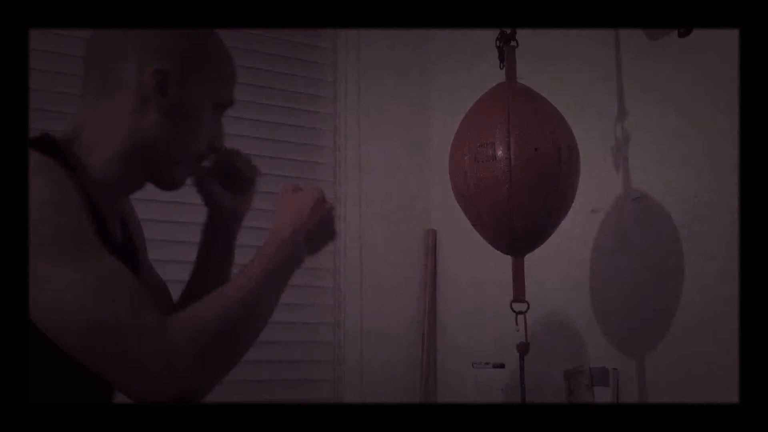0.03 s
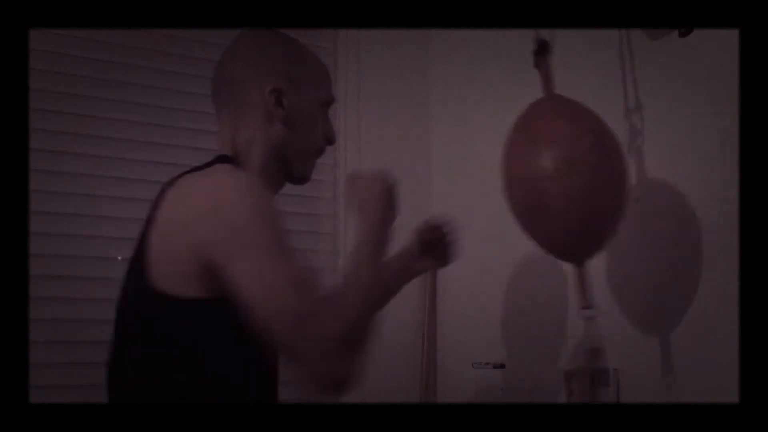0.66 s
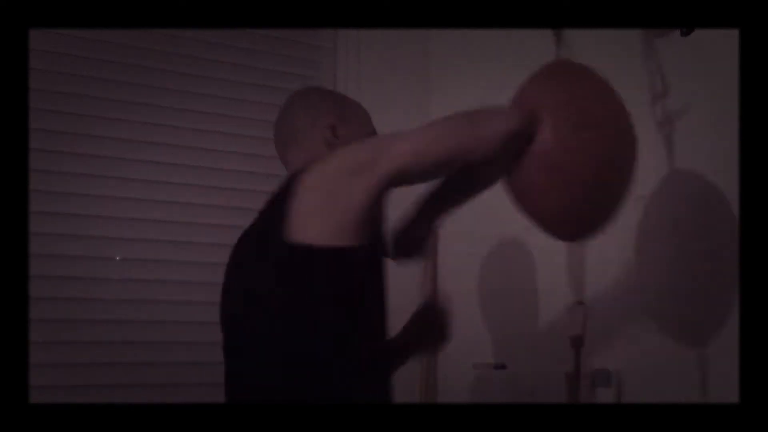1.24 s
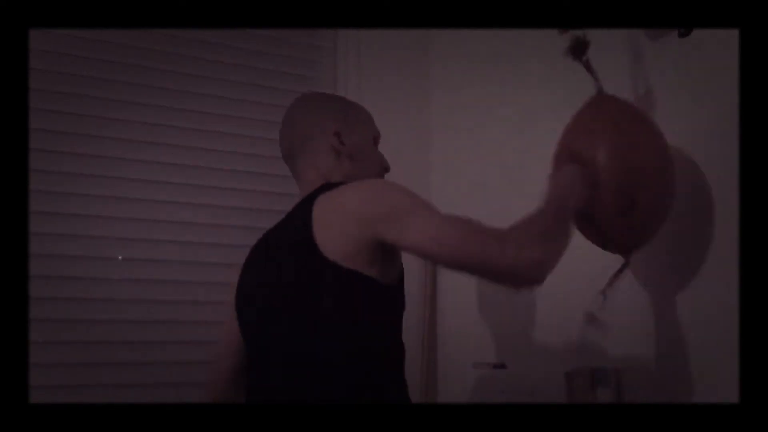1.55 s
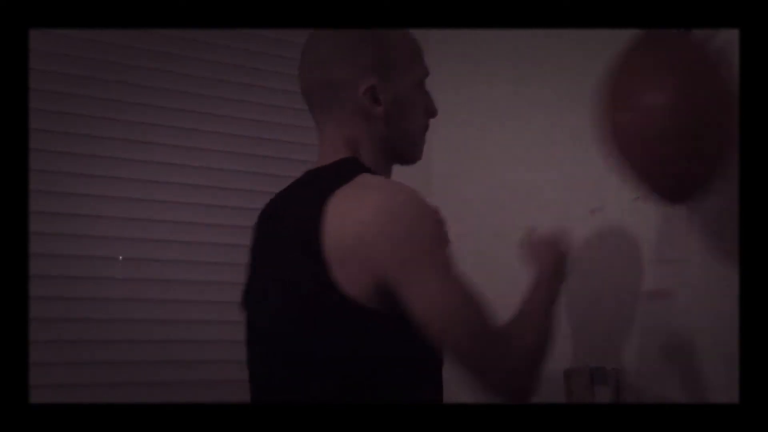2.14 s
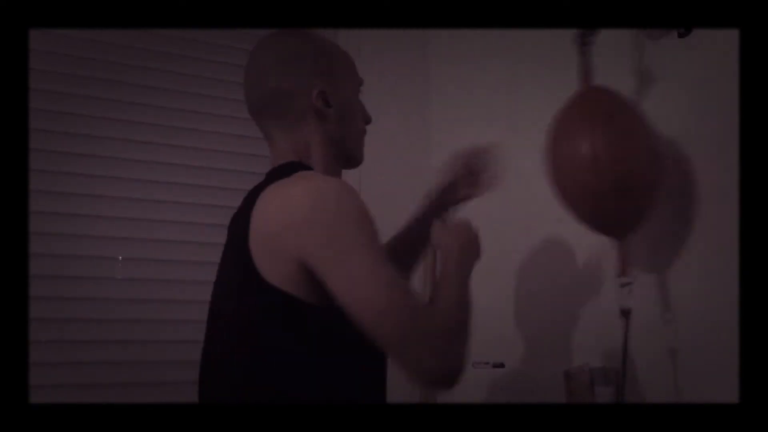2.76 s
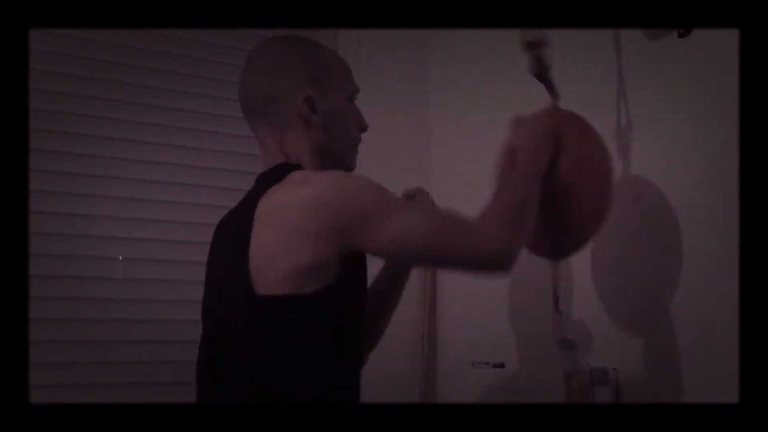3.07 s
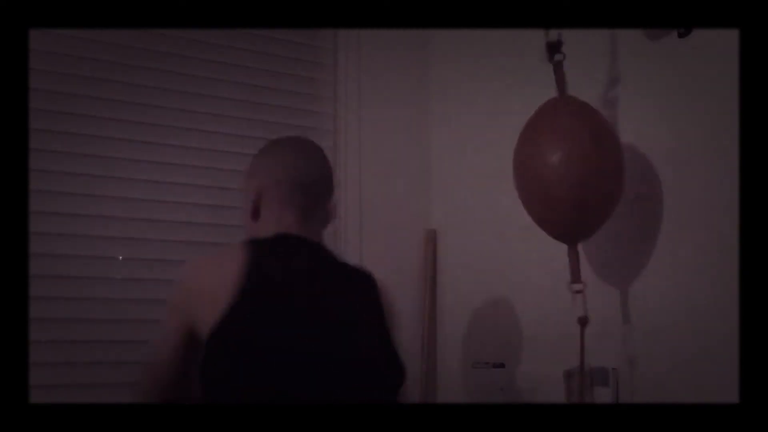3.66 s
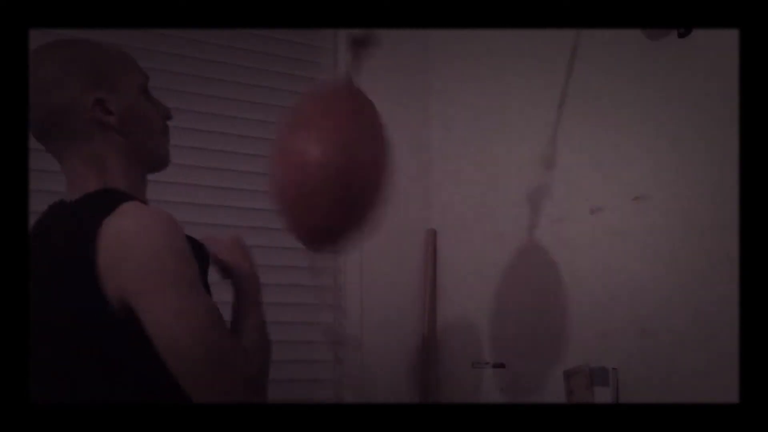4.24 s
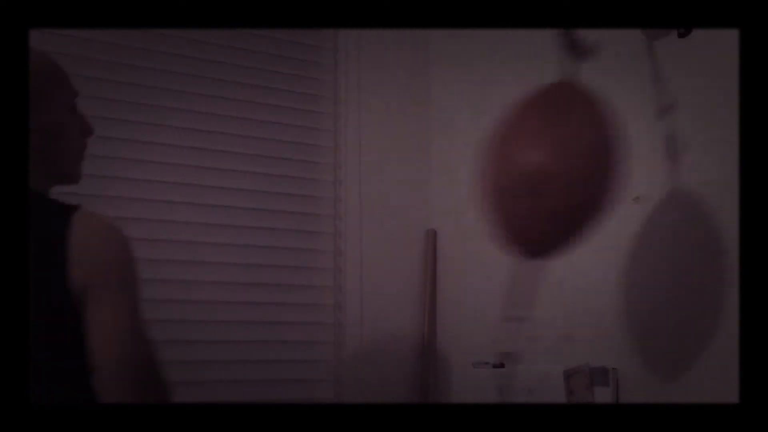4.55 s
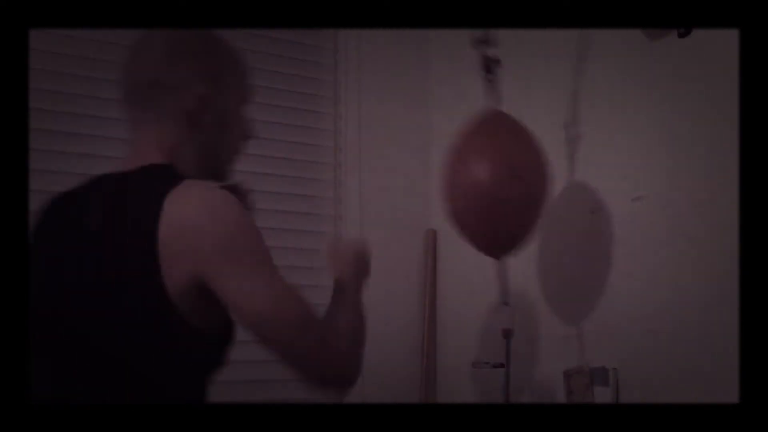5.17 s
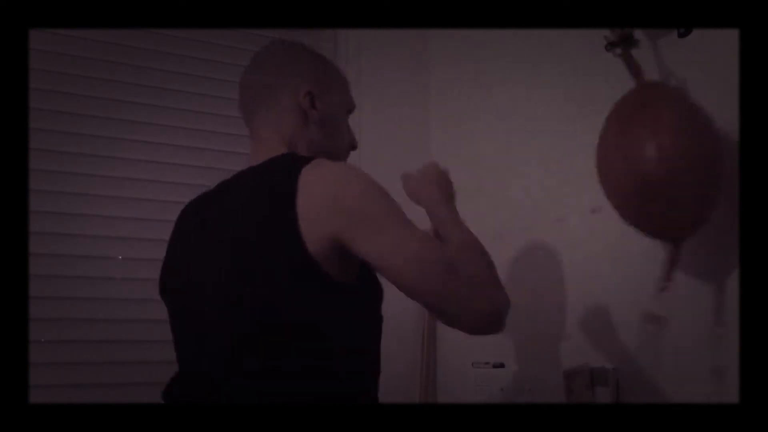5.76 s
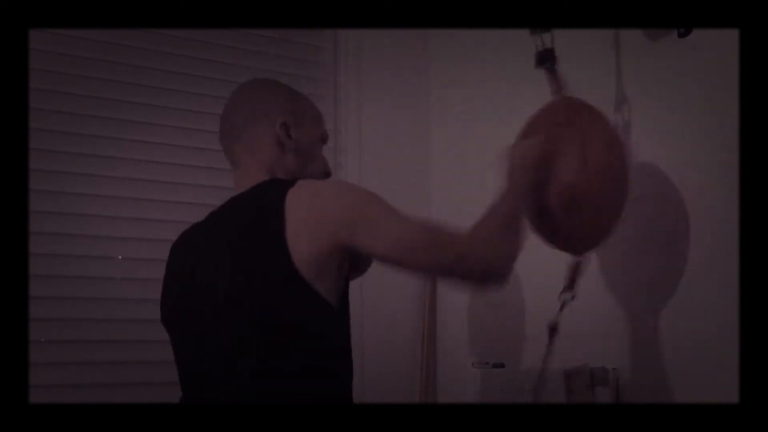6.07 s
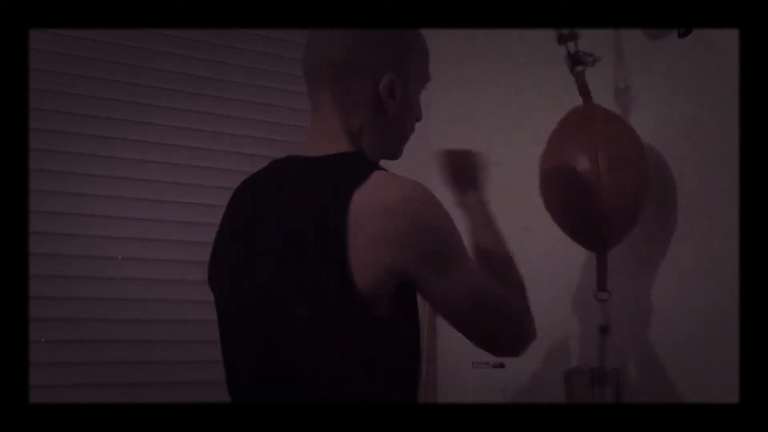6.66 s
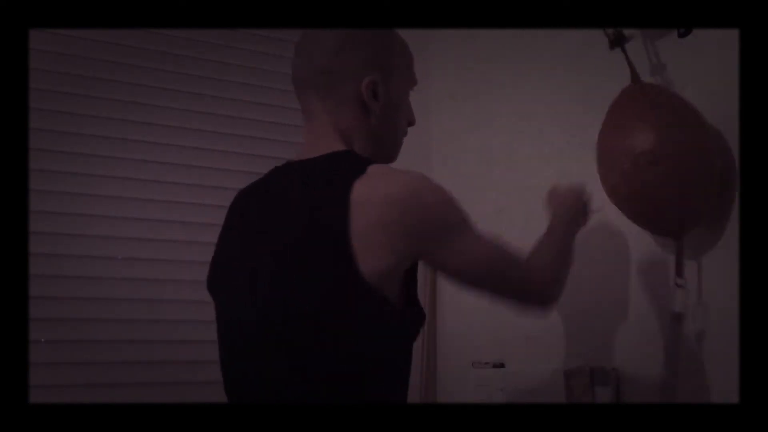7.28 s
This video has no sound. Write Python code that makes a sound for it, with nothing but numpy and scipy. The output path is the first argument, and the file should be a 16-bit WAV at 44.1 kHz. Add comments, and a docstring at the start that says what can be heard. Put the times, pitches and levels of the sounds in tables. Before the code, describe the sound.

Bare fists and elbows thud quickly on a leather double end bag, its metal fittings clinking and rattling in a small room.

```python
"""Thuds and slaps, close up: bare fists and elbows drum on a leather double end bag.
Each blow rings the air in the bag and tugs the cords, which boom in their anchors. As the bag swings,
its steel hook clinks and the links and swivels rattle. One glancing fist squeaks; feet shift softly.
One microphone stands beside the bag, in a small, hard-walled room with a faint hush of its own."""
import sys
import numpy as np
from scipy import signal
from scipy.fft import rfft, irfft, next_fast_len
from scipy.io import wavfile
from scipy.ndimage import uniform_filter1d, map_coordinates

SR = 44100
rng = np.random.default_rng(int(sys.argv[2]) if len(sys.argv) > 2 else 0)


def int16_out(signal):
    """Quantize to a 16-bit WAV file."""
    q = np.round(np.clip(np.atleast_2d(signal).T, -1, 1) * 32767)
    wavfile.write(sys.argv[1], SR, q.astype(np.int16))


N = 322371
T = np.arange(SR // 2) / SR  # the life of one sound, in seconds

# Levels in the tables are relative: each source adds its own trim.
# Blows on the bag. Each row: start in seconds, level in dB, offsets of thud, slap and crack in dB,
# pitch of the crack in Hz, offset of the ringing air inside in dB.
BAG_BLOWS = [(0.315, -9.5, -6.5, -8.5, -13, 4350, 1.5), (0.354, -12, -16, -27, -23, 2590, -4),
             (0.611, -20, -5.5, -10.5, -16, 3420, -12), (0.807, -7.5, -15.5, -16, -13, 2500, -3),
             (0.85, -9.5, -28, -17, -13, 2600, 0.5), (1.103, -11, -10.5, -11.5, -17.5, 2530, -4.5),
             (1.331, -14, -3.5, -6, -4.5, 2650, 3), (1.417, -18, -16, -23, -19, 3670, 6.5),
             (1.614, -11.5, -9.5, -18.5, -16, 2620, 0), (1.836, -11, -6, -10.5, -19, 2650, -5.5),
             (2.05, -14, -4, -9.5, -9, 2810, 3), (2.104, -17.5, -2.5, -21, -16, 3630, -5),
             (2.3285, -9, -16, -7, -2.5, 2500, -4), (2.632, -11, -3, -12.5, -19, 2440, -5),
             (2.869, -9, -9, -6.5, -36, 2640, -4), (3.107, -11.5, -11.5, -11, -21, 3320, 0.5),
             (3.477, -12, -10, -11.5, -13, 3430, -2.5), (3.972, -6, -1, -4.5, -1, 4330, -3),
             (4.087, -14, 2.5, -8, -2.5, 3110, -2), (4.109, -11, -33, -5, -9, 2730, 0.5),
             (5.118, -6.5, -7, -15, -11, 2870, -5.5), (5.448, -11.5, -7, -7.5, -16, 3550, -0.5),
             (5.649, -10, -10.5, -14.5, -14.5, 2480, -5.5), (5.907, -12.5, -5, -11.5, -5, 3670, -7),
             (6.108, -13.5, -8, -11.5, -6, 2740, -3), (6.361, -12.5, -6, -13.5, -20.5, 2940, 2.5),
             (6.411, -18, -5.5, -23, -17, 4150, -1), (6.572, -10.5, -6, -9.5, -11.5, 3040, 3),
             (6.819, -18, -5.5, -3, -34, 3290, -20), (7.033, -8, -8, -13, -16, 2390, -5),
             (7.253, -10, -5.5, -16, -11, 2380, 2.5), (7.304, -14, -31, -28, -35, 2760, -3)]
# Knuckles skidding on the leather: time in seconds, pitch in Hz, level in dB.
KNUCKLE_SKID = (5.1175, 2950, -17.5)
# The hook snapping taut. Each row: start in seconds, level in dB, offsets of sparkle and ring in dB.
HOOK_CLINKS = [(2.9655, -14.5, -12.5, -3), (3.2008, -17.5, -16, 2), (3.6715, -12.5, -13, -0.5),
               (4.1227, -13.5, -10.5, -3), (6.6778, -8, -8.5, -4)]
# The cord shaking the hook in its eye. Each row: start in seconds, level in dB, ring offset in dB.
HOOK_JOLTS = [(0.4651, -23.5, 4.5), (0.6348, -31.5, 5), (0.905, -25.5, 7.5), (3.5652, -19.5, 3.5),
              (4.043, -19.5, -3), (4.295, -27.5, 5), (5.227, -33, -10), (5.2798, -29, 7), (5.741, -25, 2.5),
              (6.4349, -24, 1), (6.921, -25.5, 9)]
# Links slipping. Each row: start in seconds, click level in dB, level of the swivels' turn in dB.
LINK_SLIPS = [(0.445, -32, -43), (0.665, -32, -45), (1.018, -30.5, -43), (1.204, -30, -46),
              (1.385, -36, -38), (1.451, -23.5, -46), (1.541, -29.5, -38), (1.675, -46, -40),
              (1.8214, -27, -50.5), (1.89, -36, -36.5), (1.9452, -31, -57), (2.0055, -24, -48),
              (2.242, -27, -54), (2.446, -37, -38), (2.5308, -19, -36), (2.6562, -21, -39),
              (2.7596, -28, -40), (3.15, -39, -28.5), (3.3812, -24.5, -48), (3.504, -26, -33.5),
              (3.8457, -22.5, -47), (4.332, -26.5, -42), (4.48, -47, -47), (4.6265, -33, -48),
              (4.7737, -32, -43.5), (4.86, -40, -39.5), (5.31, -36, -41), (5.543, -21, -53),
              (5.695, -25.5, -36.5), (5.822, -25.5, -38), (6.011, -21, -38.5), (6.192, -21.5, -33),
              (6.26, -38, -41.5), (6.39, -34, -35), (6.935, -28, -37), (7.065, -33, -38),
              (7.13, -42, -37.5)]
# How hard the swinging bag shakes its rigging. Each row: time in seconds, level in dB.
SWING_LEVELS = [(0.45, -59), (0.5, -53), (1.0, -45.5), (1.17, -49), (1.33, -50), (1.52, -40.5),
                (1.73, -49.5), (2.32, -46), (2.84, -41), (3.91, -45.5), (4.19, -42.5), (4.62, -55.5),
                (5.13, -56.5), (5.32, -49.5), (5.57, -52), (5.86, -44), (7.31, -44.5)]
# Soft footfalls. Each row: start in seconds, level in dB.
FOOTFALLS = [(0.713, -22.5), (0.98, -23.5), (1.48, -18.5), (2.764, -31), (3.6, -18.5), (3.75, -27.5),
             (4.334, -15), (4.48, -23), (4.777, -25.5), (4.845, -24), (6.25, -14.5), (6.314, -26)]

# Resonances. Each row: frequency in Hz, level in dB, time to fall 60 dB (t60) in seconds.
BAG_MODES = [(596, -15, .32), (520, -21, .15), (870, -22, .15), (985, -23, .2), (1090, -26, .18),
             (1650, -24, .18)]  # air and skin of the bag
ANCHOR_MODES = [(40.2, -16.5, 0.26), (63.3, -19, 0.44)]  # ceiling and floor under the pull of the cords
HOOK_MODES = [(1610, -19, .8), (1737, -7, .65), (1951, -7, .48), (2083, -11, .7), (2341, -13, .3),
              (2481, -12, .28), (2773, -7, .4), (2796, -1, .5), (2880, -7, .26), (3297, -4, .45),
              (3732, -12, .33), (3950, -10, .22), (4690, -12, .35), (4975, -9, .33), (5182, -12, .27),
              (5632, -13, .35), (5855, -13, .33), (5991, -9, .33), (6304, -4, .3), (6880, -9, .33),
              (7523, -11, .19), (7803, -9, .18), (8089, -8, .14), (8964, -11, .33), (9315, -11, .26),
              (11978, -3, .18), (13931, 5, .12), (14230, -10, .18)]  # the steel hook
ROOM_MODES = [(118, -17, .4), (141, -4.5, .48), (197, -11, .38), (262, -11, .48), (300, -19, .3),
              (342, -18, .35)]  # standing waves between the walls

# Spectra. Each row: frequency in Hz, level in dB.
THUD_SPECTRUM = [(25, -26), (85, -25), (130, -3.5), (180, 0.5), (300, 2.5), (420, -12.5), (600, -10.5),
                 (1500, -56.5), (5000, -104)]  # the bag giving way
SMACK_SPECTRUM = [(100, -36), (300, -0.5), (520, 2), (720, -3), (950, -0.5), (1300, -10.5), (2200, -22),
                  (6000, -74.5)]  # skin on leather, the middle range
SLAP_SPECTRUM = [(300, -43), (1100, -2), (1550, 0.5), (2000, 2.5), (2400, -4.5), (3200, -19), (8000, -30)]  # skin on leather, the upper range
CLANG_SPECTRUM = [(300, -5.5), (1200, -25), (2000, -1), (2700, 6), (4500, 3), (6500, -1), (15500, -21)]  # the hook snapping taut
SPARKLE_SPECTRUM = [(500, -13), (2500, -6.5), (5000, -9.5), (6800, -5.5), (9500, -5.5), (10400, -11),
                    (12000, -6.5), (14000, -8), (15500, -7)]  # the bright edge of steel on steel
CHATTER_SPECTRUM = [(300, -35), (1400, -2), (2350, 5.5), (2950, -18), (3500, 3), (4400, 1.5), (5400, -11),
                    (15500, -11)]  # the shaken hook
RATTLE_SPECTRUM = [(300, -25), (1000, -19), (2000, 2), (4000, 5.5), (5300, 2.5), (7000, 3), (10000, 3.5),
                   (15500, 1.5)]  # the swivels together
RUMBLE_SPECTRUM = [(22, -21), (55, -9.5), (100, -4.5), (170, -1.5), (290, 1.5), (430, -11.5), (590, -1),
                   (750, -10), (1800, -15.5), (5000, -24.5)]  # cords and floor
HUSH_SPECTRUM = [(25, -4), (150, -1.5), (500, -15.5), (2000, -16), (5000, -21.5), (15000, -31)]  # the still room
# The leather's crack. Each row: frequency as a multiple of the crack's pitch, level in dB.
CRACK_SHAPE = [(.2, -3.5), (.6, -5), (.85, -4), (1.02, -0.5), (1.4, -6), (2.3, -11.5), (4.5, -15.5)]
# The swivels. Each entry: the frequency in Hz where one is brightest.
SWIVEL_PEAKS = [3840, 6540, 9000, 13700]

# The room's tail. Each row: frequency in Hz, t60 in seconds.
ROOM_DECAY = [(60, 0.78), (200, 0.52), (600, 0.5), (1500, .48), (4000, 0.36), (14000, 0.28)]
# Echoes off the nearest surfaces. Each row: delay at the microphone in seconds, level in dB.
WALL_ECHOES = [(.0042, -14.5), (.0078, -7.5), (.0096, -6), (0.016, -12.5)]


def bag():
    """The bag gives with a thud, the leather smacks and cracks, and the cords pass the jolt to the room."""
    out = np.zeros(N)
    for start, db, thud_db, slap_db, crack_db, crack_hz, air_db in BAG_BLOWS:
        crack_spectrum = [(ratio * crack_hz, level) for ratio, level in CRACK_SHAPE]
        thud = amp(thud_db - 2) * contact(THUD_SPECTRUM, t60=0.04, scatter_db=8)
        smack = amp(-6) * contact(SMACK_SPECTRUM, t60=0.045, scatter_db=-1)
        slap = amp(slap_db) * contact(SLAP_SPECTRUM, t60=0.035, scatter_db=-2)
        crack = amp(crack_db - 2.5) * contact(crack_spectrum, t60=0.022, scatter_db=2)
        air = amp(air_db + 1) * ring(BAG_MODES, attack=0.002, spread_db=2, detune=0.008)
        boom = amp(thud_db / 2 - 5.5) * ring(ROOM_MODES, attack=0.0042, spread_db=3.5)
        tug = amp(0.5) * ring(ANCHOR_MODES, attack=0.01, spread_db=-0.5)
        body = in_room(thud + smack, wet_db=-7.5, build=0.012)
        leather = in_room(slap + crack, wet_db=-6.5, build=0.004)
        add(out, start, amp(db) * (body + leather + air + boom + tug))
        # the flung bag jerks against its cords a moment later
        jerk_thud = contact(THUD_SPECTRUM, t60=0.17, scatter_db=-1)
        jerk_smack = amp(-2) * contact(SMACK_SPECTRUM, t60=0.15, scatter_db=-6)
        lag = 0.045 + 0.0052 * rng.standard_normal()
        add(out, start + lag, amp(db - 19) * (jerk_thud + jerk_smack))
    return out


def squeak(lead_s=0.03):
    """A glancing fist sticks and slips on the leather for an instant."""
    peak_time, hz, db = KNUCKLE_SKID
    swell = np.exp(-np.abs(T - lead_s) / 0.0028)
    pitch = hz * (1 + 0.091 * wobble(610)[:len(T)])
    chirp = swell * np.sin(2 * np.pi * np.cumsum(pitch) / SR)
    out = np.zeros(N)
    add(out, peak_time - lead_s, amp(db) * in_room(chirp, wet_db=-18))
    return out


def hook():
    """Steel jerks against steel: a bright clang when it snaps taut, a duller chatter when only shaken."""
    out = np.zeros(N)
    for start, db, sparkle_db, ring_db in HOOK_CLINKS:
        clang = amp(-6) * contact(CLANG_SPECTRUM, t60=0.12, scatter_db=16)
        sparkle = amp(sparkle_db + 8) * contact(SPARKLE_SPECTRUM, t60=0.088, scatter_db=24)
        tone = amp(ring_db - 9.5) * in_room(hook_ring(treble_db=sparkle_db / 2), wet_db=-14)
        add(out, start, amp(db) * (in_room(clang + sparkle, wet_db=-6) + tone))
    soft_onset = 1 - np.exp(-T / 0.013)
    for start, db, ring_db in HOOK_JOLTS:
        chatter = crest(contact(CHATTER_SPECTRUM, t60=0.045, scatter_db=7) * soft_onset)
        tone = amp(ring_db + 2) * hook_ring(treble_db=-71.5)
        add(out, start - 0.003, amp(db - 5) * (in_room(chatter, wet_db=-2.5) + tone))
    return out


def hook_ring(treble_db):
    """The struck hook rings on; harder contacts reach its high modes."""
    modes = [(hz, db + treble_db * hz / (hz + 7000), t60) for hz, db, t60 in HOOK_MODES]
    return ring(modes, attack=0.001, spread_db=1.2)


def links():
    """The links slip over each other with small, dry clicks."""
    out = np.zeros(N)
    for start, db, _ in LINK_SLIPS:
        click = contact(SPARKLE_SPECTRUM, t60=0.055, scatter_db=24)
        add(out, start, amp(db - 6.5) * in_room(click, wet_db=-11.5))
    return out


def rigging(cords_db=4.5):
    """While the bag swings, the swivels rattle and the cords rumble."""
    ticks = sum(swivel(hz) for hz in SWIVEL_PEAKS)
    rattle = unit(in_room(colour(ticks, RATTLE_SPECTRUM), wet_db=-4, build=0.0011))
    swell = amp(2.5 * wobble(18))
    rumble = unit(colour(rng.standard_normal(N), RUMBLE_SPECTRUM) * swell)
    times, levels = np.transpose(SWING_LEVELS)
    swing = amp(np.interp(np.arange(N) / SR, times, levels, left=-np.inf))
    rattle_gain = np.hypot(lull() * swing, turns())
    return rattle_gain * rattle + amp(cords_db) * swing * rumble


def swivel(hz, slips_per_s=38, ticks_per_s=3500):
    """A swivel turns in short slips, each a burst of tiny ticks that starts sharply and dies away."""
    slips = (rng.random(N) < slips_per_s / SR) * amp(3 * rng.standard_normal(N))
    bursts = signal.lfilter([1], [1, -np.exp(-1 / (0.011 * SR))], slips)
    ticks = (rng.random(N) < ticks_per_s / SR) * rng.standard_normal(N)
    spectrum = [(hz / 3, -12), (hz / 1.09, -7), (hz, 0), (hz * 1.44, -10)]
    return unit(colour(ticks * (0.1 + bursts), spectrum)) * np.sqrt(hz)


def lull(depth_db=7.5, settle_s=0.05):
    """A dip in the rattle's gain: the fittings settle just before each blow, clink or slip."""
    t = np.arange(N) / SR
    starts = np.sort([row[0] for row in BAG_BLOWS + HOOK_CLINKS + LINK_SLIPS] + [np.inf])
    until_next = starts[np.searchsorted(starts, t)] - t
    return amp(-depth_db * np.exp(-until_next / settle_s))


def turns(rise_s=0.016, t60=0.3):
    """A swell in the rattle's gain: each slip of a link spins the swivels up, and they soon stop."""
    out = np.zeros(N)
    t = T - 0.1  # seconds from the slip
    turn = np.where(t < 0, np.exp(-np.abs(t) / rise_s), fade(np.abs(t), t60))
    for start, _, turn_db in LINK_SLIPS:
        add(out, start + t[0], amp(turn_db) * turn)
    return out


def feet():
    """The boxer shifts his weight on the floor with soft bumps."""
    out = np.zeros(N)
    for start, db in FOOTFALLS:
        step = contact(RUMBLE_SPECTRUM, t60=0.16, scatter_db=16)
        add(out, start, amp(db - 13) * in_room(step, wet_db=-3))
    return out


def room_tone():
    """The faint hush of the room, behind everything."""
    return amp(-65.5) * unit(colour(rng.standard_normal(N), HUSH_SPECTRUM))


def in_room(x, wet_db, build=0.0026, size=256):
    """The direct sound plus a diffuse tail, which builds up for a moment and loses its treble first."""
    blocks = rfft(rng.standard_normal((len(T) // size, size)))
    ages = np.arange(len(blocks))[:, None] * size / SR
    t60 = along(ROOM_DECAY, np.fft.rfftfreq(size, 1 / SR))
    tail = irfft(blocks * fade(ages, t60)).ravel()
    tail *= 1 - np.exp(-T[:len(tail)] / build)
    tail /= np.linalg.norm(tail)
    return x + amp(wet_db) * signal.fftconvolve(x, tail)[:len(x)]


def contact(spectrum, t60, scatter_db, size=4096):
    """One push, its echoes off the nearest surfaces and a dying scatter, coloured by what was struck."""
    scatter = rng.standard_normal(size) * fade(T[:size], t60)
    push = amp(scatter_db) * scatter / np.linalg.norm(scatter)
    push[0] += 1
    for delay, db in WALL_ECHOES:
        push[int(delay * rng.uniform(0.85, 1.15) * SR)] += amp(db)
    return np.pad(crest(colour(push, spectrum)), (0, len(T) - size))


def ring(modes, attack, spread_db, detune=0):
    """Damped modes, struck at new strengths every time; a body that deforms is slightly detuned too."""
    hz, db, t60 = np.transpose(modes)
    hz = hz * (1 + detune * rng.standard_normal(len(hz)))
    gain = amp(db + spread_db * rng.standard_normal(len(hz)))
    phase = 2 * np.pi * rng.random((len(hz), 1))
    partials = fade(T, t60[:, None]) * np.sin(2 * np.pi * hz[:, None] * T + phase)
    return gain @ partials * (1 - np.exp(-T / attack))


def colour(x, spectrum, size=4096):
    """Causal (minimum-phase) filter with the given spectrum."""
    gain = amp(along(spectrum, np.fft.rfftfreq(size, 1 / SR)))
    cepstrum = irfft(np.log(gain))
    cepstrum[1:size // 2] *= 2
    cepstrum[size // 2 + 1:] = 0
    impulse = irfft(np.exp(rfft(cepstrum)))
    return signal.fftconvolve(x, impulse)[:len(x)]


def along(points, hz):
    """Interpolate (Hz, value) points on a log frequency axis."""
    freqs, values = np.transpose(points)
    return np.interp(np.log(hz + 1), np.log(freqs), values)


def wobble(rate):
    """A random curve through rate knots a second."""
    knots = rng.standard_normal(int(N * rate / SR) + 4)
    return map_coordinates(knots, [np.arange(N) * rate / SR], order=1)


def fade(t, t60):
    """Exponential decay, 60 dB in t60 seconds."""
    return np.exp(-np.log(1000) * t / t60)


def amp(db):
    """Decibels to gain."""
    return 10 ** (np.asarray(db) / 20)


def unit(x):
    """Scale to rms 1."""
    return x / np.sqrt(np.mean(x ** 2) + 1e-20)


def crest(x):
    """Scale so that the loudest few milliseconds have rms 1."""
    return x / np.sqrt(uniform_filter1d(x ** 2, size=256).max() + 1e-20)


def add(track, start, sound):
    """Mix a sound in at start seconds."""
    part = track[max(round(start * SR), 0):][:len(sound)]
    part += sound[:len(part)]


def scene():
    """Everything reaches one microphone beside the bag."""
    return (bag() + squeak() + hook() + links() + feet() + rigging() + room_tone())[None]


def record(dry):
    """The recorder rounds off the hardest peaks and keeps nothing above its band limit."""
    top_hz = 15850
    rounded = dry / (1 + np.abs(dry) ** 6) ** (1 / 6)
    size = next_fast_len(N + SR // 2)
    in_band = np.fft.rfftfreq(size, 1 / SR) < top_hz
    return irfft(rfft(rounded, size) * in_band, size)[:, :N]


dry = scene()
out = record(dry)
int16_out(out)
```